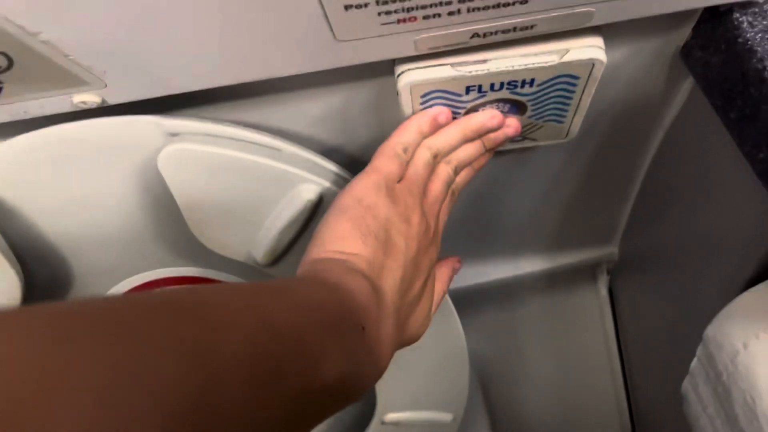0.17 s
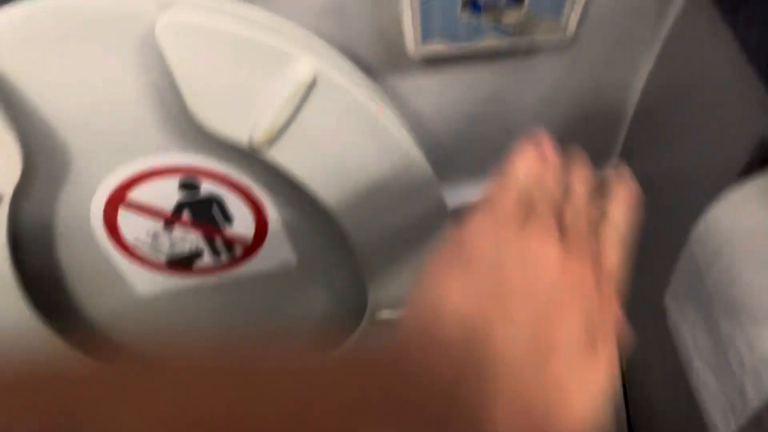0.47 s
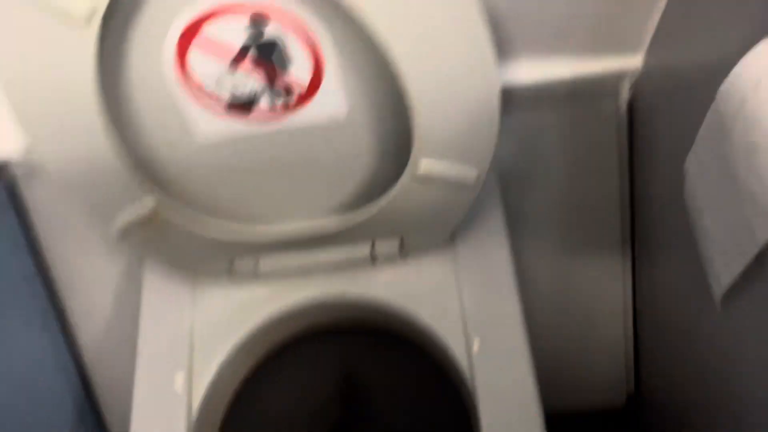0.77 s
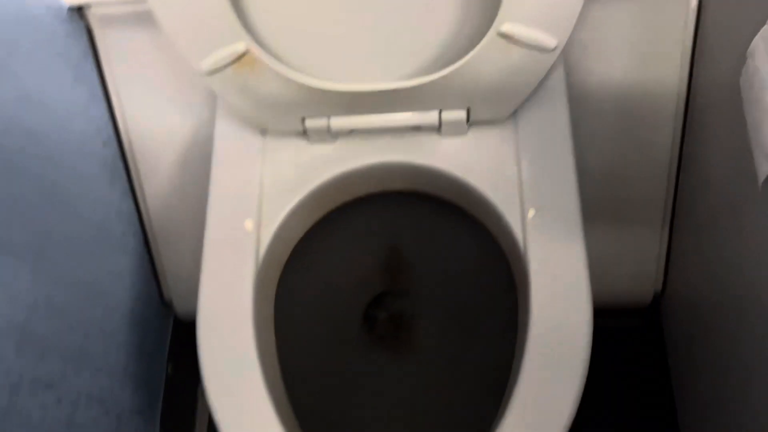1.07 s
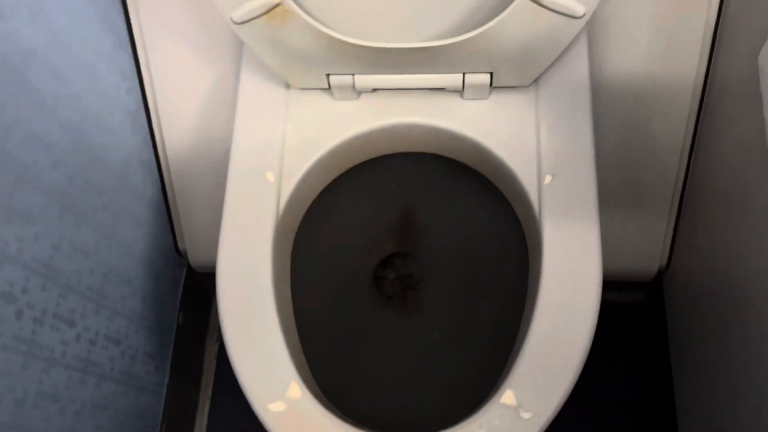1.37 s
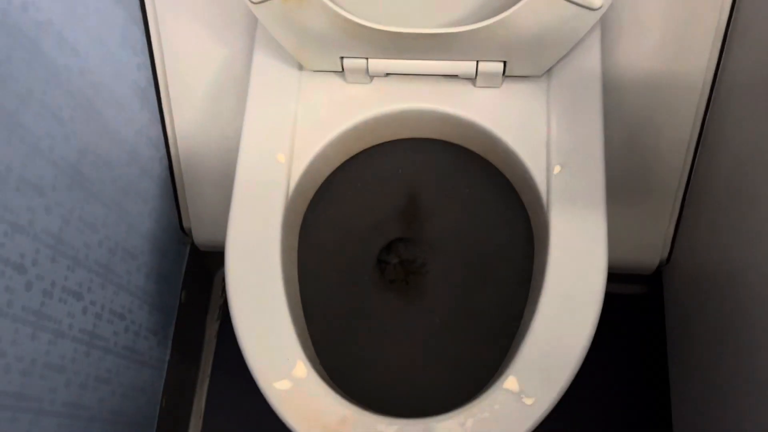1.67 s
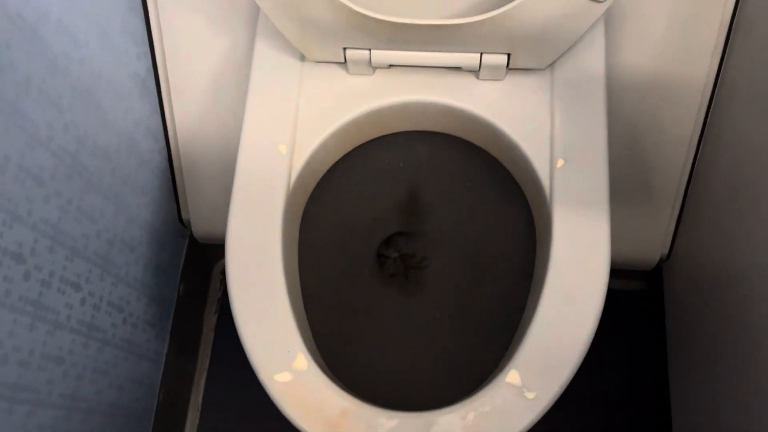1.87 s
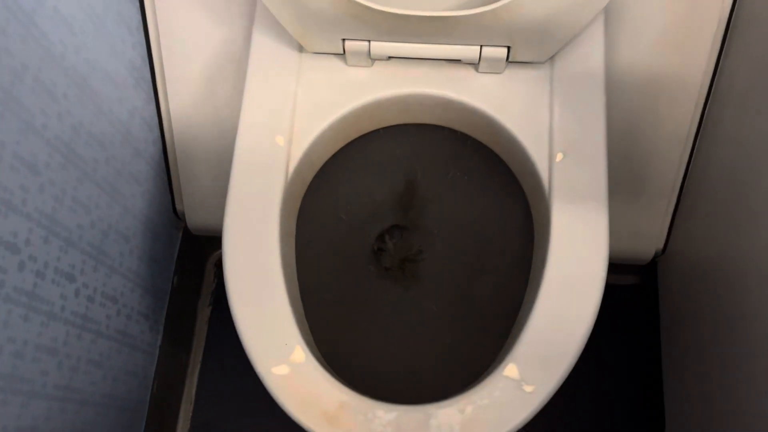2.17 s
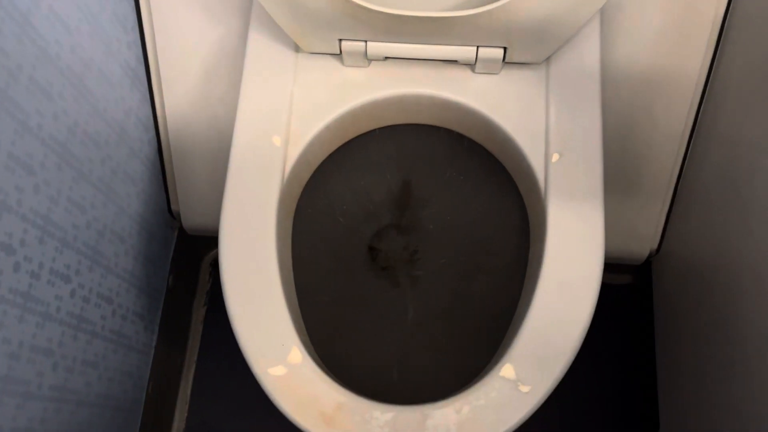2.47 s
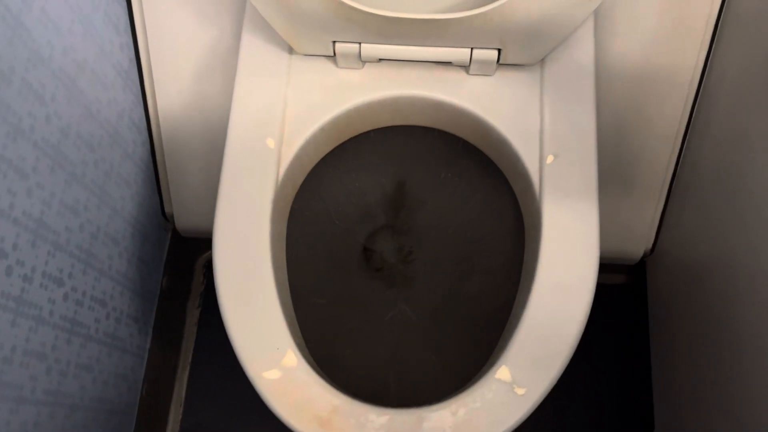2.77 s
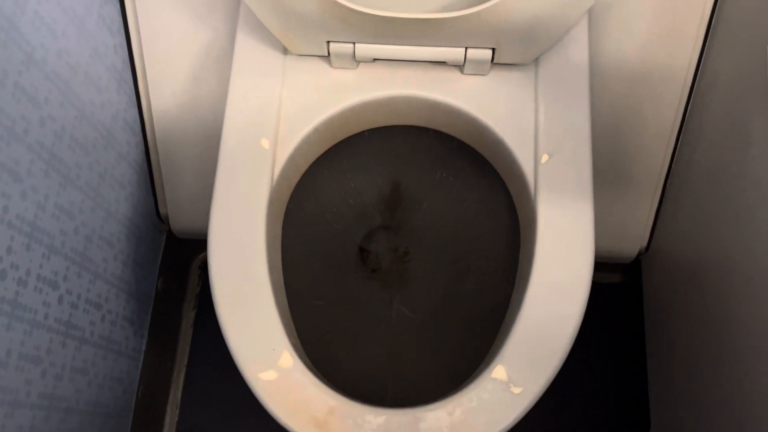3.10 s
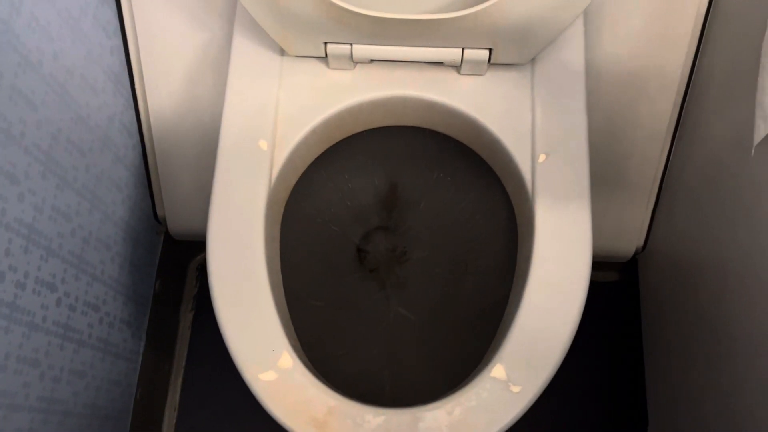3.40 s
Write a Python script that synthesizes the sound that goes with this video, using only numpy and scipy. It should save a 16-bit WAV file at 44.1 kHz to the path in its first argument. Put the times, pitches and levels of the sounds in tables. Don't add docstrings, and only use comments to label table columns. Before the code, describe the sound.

An aircraft-style vacuum toilet flushes with a hissing rinse, deep gulp and rushing air over low drone

```python
import sys
import numpy as np
from scipy import signal
from scipy.fft import rfft, irfft, next_fast_len
from scipy.io import wavfile

SR = 44100
rng = np.random.default_rng(int(sys.argv[2]) if len(sys.argv) > 2 else 0)


def dump(signal):
    limited = np.clip(np.atleast_2d(signal).T, -1, 1)
    pcm = np.round(limited * 32767).astype(np.int16)
    wavfile.write(sys.argv[1], SR, pcm)


def natural_amplitude(level_db):
    exponent = np.asarray(level_db, float) / 20
    return 10 ** exponent


N = 156114

# (frequency [Hz], density [dB per Hz])
CABIN_COLOUR = [(25, -23), (60, -7.5), (110, -14.5), (220, -27.5), (600, -32.5), (1600, -43.5),
                (3300, -50.5), (5500, -81)]
# (frequency [Hz], width [Hz], level [dB])
WALL_BOOMS = [(75, 10.6, 2.5), (90.9, 6.8, -1), (145.2, 21.7, -5.5), (430, 52, -12), (534, 50, -24),
              (1363, 150, -24)]
CABIN_DB, BOOMS_DB = -14.5, -2.5

# (time [s], crack [dB], body [dB])
BUTTON_HITS = [
    (.056, -20.5, -16.5),
    (.0655, -20.5, -15),
    (.302, -36.5, -29),
]
# (time [s], crack [dB], body [dB])
RINSE_VALVE_HITS = [
    (1.709, -28.5, -17),
    (1.7125, -23, -18),
    (1.7215, -36, -7),
]
# (time [s], crack [dB], body [dB])
DRAIN_VALVE_HITS = [
    (3.41, -10.5, -21.5),
    (3.4135, -7, -10.5),
    (3.424, -11, -10.5),
]
# (frequency [Hz], level [dB], t60 [s])
PLATE_MODES = [(203.6, 0.5, 0.19), (478, 2.5, .06), (792, -6, 0.073), (1436, -7.5, 0.1),
               (1963, -3.5, 0.039), (3220, -14, .04), (5300, -15, 0.025)]
# (frequency [Hz], level [dB], t60 [s])
VALVE_MODES = [(157.4, -5, 0.19), (307.5, -6, 0.07), (465, -10, 0.035), (743, -9, 0.031),
               (1223, -12.5, 0.018), (2200, -21.5, 0.081)]
# (frequency [Hz], density [dB per Hz])
PLATE_CRACK = [(300, 11), (1500, -2.5), (3500, -1.5), (5300, -5.5), (7500, -3), (10000, -46), (15000, -43)]
RINSE_CRACK = [(300, 15.5), (2000, -7), (5000, -9.5), (9500, -6.5), (11500, -15), (15000, -15)]
DRAIN_CRACK = [(300, 3), (2500, -15.5), (6000, -14.5), (9000, -27.5)]

# (time [s], length [s], frequency [Hz], level [dB])
SHUDDERS = [(0.0585, 0.001, 5300, -16.5), (0.065, 0.0013, 4040, -17), (0.077, 0.011, 207.4, -15),
            (0.307, .003, 5300, -37), (.191, .0004, 11500, -46), (1.712, 0.0027, 10000, -19),
            (1.712, 0.0014, 2200, -23.5), (1.712, .0015, 14000, -38), (3.4142, 0.00088, 4250, -21),
            (3.416, 0.0018, 2120, -9), (3.429, 0.0026, 1300, -12), (3.417, 0.0027, 991, -15.5),
            (0.346, 0.018, 270.8, -21.5), (2.328, 0.0034, 1900, -5.5), (2.341, .01, 3200, -11),
            (2.342, .008, 1002, -12), (2.37, 0.0046, 2020, -10), (2.341, 0.0094, 3755, -18.5),
            (2.344, 0.0076, 2300, -10.5), (2.373, 0.017, 1500, -5), (2.375, 0.0051, 1970, -3),
            (2.463, .015, 720, -9.5), (1.725, 0.017, 601, -21.5), (1.727, 0.002, 330, -13),
            (2.22, 0.0061, 75, -24), (2.374, 0.012, 460, -4), (2.389, 0.0081, 230.8, -0.5),
            (2.424, 0.011, 417, -3), (2.402, 0.025, 983, -3.5), (2.44, 0.027, 183.5, -11.5),
            (2.48, 0.0074, 287.3, -5.5), (2.489, 0.0037, 256.6, -3), (3.059, 0.045, 54.76, -5),
            (3.344, 0.016, 79.4, -18.5), (3.432, 0.0068, 327.7, -2), (3.442, 0.007, 133.5, -6)]

# (time [s], level [dB])
RINSE_PRESSURE = [(1.705, -89), (1.73, -63.5), (1.78, -42), (1.86, -32), (1.96, -22), (2.0, -20.5),
                  (2.07, -22), (2.13, -22.5), (2.2, -22), (2.33, -17.5), (2.42, -23.5), (2.7, -19.5),
                  (3.54, -25.5)]
# (frequency [Hz], density [dB per Hz])
SPRAY_COLOUR = [(700, -8), (2000, -4.5), (4000, -3.5), (6500, 0.5), (9500, -3), (11500, -0.5), (14000, -3),
                (16000, -6)]
OPEN_S, SWALLOW_HZ, SWALLOW_WIDTH_HZ, SWALLOW_SHARE = 2.1, 4030, 440, .8

# (time [s], level [dB], centre [Hz])
GULP = [
    (2.2, -37.5, 2310),
    (2.3, -20.5, 2210),
    (2.335, -9, 2200),
    (2.37, -5.5, 1110),
    (2.4, -5, 500),
    (2.45, -8, 443),
    (2.475, -4.5, 400),
    (2.51, -31, 397),
    (2.56, -33, 400),
]
GULP_RAGGED_DB = 1
GULP_FALL_DB = 1.2
CREST_S, CREST_LENGTH_S, CREST_DB = 2.335, 0.024, 10.5
# (time [s], level [dB])
FLOW = [
    (2.2, -40),
    (2.3, -31),
    (2.4, -10),
    (2.55, -17.5),
    (3.0, -19),
    (3.42, -23.5),
    (3.54, -22),
]
# (frequency [Hz], density [dB per Hz])
ROAR_COLOUR = [(120, 5), (250, 0), (500, 5.5), (900, 0), (1500, 4), (2300, -1), (4000, -9), (8000, -19)]
# (frequency [Hz], width [Hz], level [dB])
PIPE_MODES = [(222, 44, -0.5), (407.7, 19, 8), (731, 29, -4.5), (1007.5, 35, 10), (1492, 16.7, 4.5),
              (1719, 25, 3.5), (1959, 35, 6), (2288, 30, 8), (2670, 35, -10.5), (3165, 45, 7.5),
              (3600, 20, 2.5), (4710, 24, -1), (4816, 21, 1), (5400, 52, -22), (6020, 58, -6)]
# (frequency [Hz], width [Hz])
BRANCH_DIPS = [(900, 180), (4050, 340)]

# (frequency [Hz], left lead [rad], likeness [0-1], left-right [dB], colour [dB])
PORTS = [(0, .1, .99, 0, 1.5), (90, -.15, .99, -.2, 1), (170, -.28, .99, .5, .5), (280, -.4, .985, .6, -1),
         (520, -.7, 1, 0.3, -1), (670, 1, .45, -2, 0), (760, 1.1, 0.52, -6, 2), (967, 1.6, .6, 1, -3),
         (1100, 1.4, 0.9, -0.5, 1), (1600, 1.6, .5, -3, 0.5), (1800, -1, 0.65, 3.5, -4.5),
         (2300, 0.26, 1, -2.5, -1.5), (2820, 1.5, 0.78, 2, 0.5), (3700, 1, .85, .5, -1),
         (3950, .75, .87, .5, -2), (4300, .7, .87, 0, -2), (4600, .65, .85, -.5, -2),
         (5000, .6, 0.85, -2, -2.5), (5400, 0.8, 0.17, 0.5, -5), (6240, -0.6, 0.54, -2, -2),
         (7860, -3, 1, 5, -3.5), (8470, -2.5, 0.75, -0.5, -0.5), (11050, -5.5, .75, 0.5, 0),
         (13000, -5, 0.82, 0, -1), (14600, -11, .75, 1.5, -5)]
# (low [Hz], high [Hz])
MID_LOST = [(7610, 8950), (14560, 22000)]
SIDE_LOST = [(11100, 13020)]
ROOM_T60_S, ROOM_DB = 0.094, -8.5
# (time [s], level [dB])
AUTO_GAIN = [(0, 0), (1.7, -1.5), (2.0, 0), (2.32, -1.5), (2.39, -6.5), (2.55, -10.5), (3.05, -4.5),
             (3.42, -2), (3.45, -5), (3.54, -6.5)]
HISS_DB, PEAK_LIMIT = -48, 1.38


def rms_one(x):
    return x / np.sqrt(np.mean(x ** 2) + 1e-20)


def in_time(rows):
    s, *columns = np.transpose(rows)
    return [np.interp(np.arange(N) / SR, s, column) for column in columns]


def at_hz(points, hz):
    points_hz, db = np.array(points).T
    return np.interp(np.log(hz), np.log(points_hz), db)


def drift(rate_hz):
    r = np.exp(-80 * np.pi * rate_hz / SR)
    slow = signal.lfilter([1], [1, -2 * r, r * r], rng.standard_normal(N // 40 + 2002))[2000:]
    return np.interp(np.arange(N) / 40, np.arange(len(slow)), rms_one(slow))


def peak(x, hz, width_hz):
    r = np.exp(-np.pi * width_hz / SR)
    feedback = [1, -2 * r * np.cos(2 * np.pi * hz / SR), r * r]
    return signal.lfilter(np.array([1, 0, -1]) * (1 - r * r) / 2, feedback, x)


def bands(colour, patchy_db, move_db, start=0, stop=N):
    out, together = np.zeros((2, N)), drift(2.7)
    edges_hz = 22 * 2 ** np.arange(0, 9.6, .5)
    settle = 8000
    white = rng.standard_normal((2, 2, stop - start + settle))
    for k, (low, high) in enumerate(zip(edges_hz, edges_hz[1:])):
        hz = np.sqrt(low * high)
        if colour[0][0] / 1.5 < hz < colour[-1][0] * 1.5:
            sos = signal.butter(2, [low, high], "band", fs=SR, output="sos")
            band = signal.sosfilt(sos, white[k % 2])[:, settle:]
            patches_db = patchy_db * (.5 * together + drift(7.3))
            level_db = at_hz(colour, hz) + move_db(hz) + patches_db
            out[:, start:stop] += band * natural_amplitude(level_db[start:stop])
    return out


def cabin():
    air = rms_one(bands(CABIN_COLOUR, patchy_db=1.87, move_db=lambda hz: 0))
    air = signal.sosfilt(signal.butter(2, 4500, fs=SR, output="sos"), air)
    white = rng.standard_normal((2, N + SR))
    booms = np.zeros((2, N))
    for hz, width_hz, db in WALL_BOOMS:
        boom = peak(peak(white, hz, width_hz), hz, width_hz)[:, SR:]
        booms += natural_amplitude(db) * rms_one(boom)
    return natural_amplitude(CABIN_DB) * rms_one(air + natural_amplitude(BOOMS_DB) * booms)


def knock(hits, modes, crack, t60_s, top_hz):
    t, out = np.arange(N) / SR, np.zeros((2, N))
    for hz, db, ring_s in modes:
        clicks = np.full((2, N), 1e-18)
        for s, _, body_db in hits:
            clicks[:, int(s * SR)] = natural_amplitude(body_db + db + rng.normal(0, 1, 2))
        r, w = natural_amplitude(-60 / (ring_s * SR)), 2 * np.pi * hz / SR
        out += signal.lfilter([0, np.sin(w)], [1, -2 * r * np.cos(w), r * r], clicks)

    def fade_db(hz):
        life_s = t60_s * (hz / 1000) ** -.25
        fades = [np.where(t < s, -200, db - 60 * (t - s) / life_s) for s, db, _ in hits]
        return np.max(fades, axis=0).clip(-200)

    start, stop = int(hits[0][0] * SR), min(N, int(hits[-1][0] * SR) + SR // 4)
    out = out + natural_amplitude(11) * bands(crack, patchy_db=0, move_db=fade_db, start=start, stop=stop)
    return signal.sosfilt(signal.butter(4, top_hz, fs=SR, output="sos"), out)


def shudders():
    t, out = np.arange(N) / SR, np.zeros(N)
    for s, length_s, hz, db in SHUDDERS:
        out += natural_amplitude(db) * np.exp(-((t - s) / length_s) ** 2) * np.sin(2 * np.pi * hz * t)
    return out * [[1], [.4]]


def rinse():
    water = rms_one(bands(SPRAY_COLOUR, patchy_db=1.04, move_db=lambda hz: 0))
    spray = natural_amplitude(in_time(RINSE_PRESSURE)[0]) * water
    drain_open = np.arange(N) / SR > OPEN_S
    return spray - SWALLOW_SHARE * drain_open * peak(spray, SWALLOW_HZ, SWALLOW_WIDTH_HZ)


def suction():
    (flow_db,), (gulp_db, centre_hz) = in_time(FLOW), in_time(GULP)
    crest_db = CREST_DB * np.exp(-((np.arange(N) / SR - CREST_S) / CREST_LENGTH_S) ** 2)
    gulp_db = gulp_db + GULP_RAGGED_DB * drift(66)

    def air_db(hz):
        gulp_here_db = gulp_db - GULP_FALL_DB * np.log2(hz / centre_hz) ** 2
        return 9.5 + np.maximum(flow_db, gulp_here_db) + crest_db * (hz > 3500)

    air = bands(ROAR_COLOUR, patchy_db=0.58, move_db=air_db)
    out = natural_amplitude(-4) * air
    for k, (hz, width_hz, db) in enumerate(PIPE_MODES):
        out = out + (-1) ** k * natural_amplitude(db) * peak(air, hz, width_hz)
    for hz, width_hz in BRANCH_DIPS:
        out = out - 1.46 * peak(out, hz, width_hz)
    return out


def at_ports(air):
    size = next_fast_len(N + SR // 2)
    hz = np.arange(size // 2 + 1) * SR / size
    t = np.arange(SR // 3) / SR
    echo = rng.standard_normal((2, len(t))) * natural_amplitude(-60 * t / ROOM_T60_S) * (t > .003)
    echo = natural_amplitude(ROOM_DB) * echo / np.sqrt(np.sum(echo ** 2, axis=1, keepdims=True))
    ports_hz, *columns = np.transpose(PORTS)
    lead_rad, alike, pan_db, colour_db = (np.interp(hz, ports_hz, c) for c in columns)
    room = 1 + rfft(echo, size) * (hz > 200)
    direct, diffuse = rfft(air, size) * room * natural_amplitude(colour_db)
    alike = np.clip(alike, 0, 1)
    direct, diffuse = direct * np.sqrt((1 + alike) / 2), diffuse * np.sqrt((1 - alike) / 2)
    turn = np.exp(.5j * lead_rad) * natural_amplitude(pan_db / 2)
    return irfft(np.array([(direct + diffuse) * turn, (direct - diffuse) / turn]), size)[:, :N]


def scene():
    hiss = natural_amplitude(HISS_DB) * signal.lfilter([.3], [1, -.7], rng.standard_normal((2, N)))
    air = cabin() + hiss
    air = air + knock(BUTTON_HITS, PLATE_MODES, PLATE_CRACK, t60_s=0.099, top_hz=9500)
    air = air + shudders()
    air = air + knock(RINSE_VALVE_HITS, VALVE_MODES, RINSE_CRACK, t60_s=0.14, top_hz=17000)
    air = air + rinse() + suction()
    air = air + knock(DRAIN_VALVE_HITS, VALVE_MODES, DRAIN_CRACK, t60_s=0.099, top_hz=8000)
    return at_ports(air)


def roll_off(x):
    return signal.sosfilt(signal.butter(12, 15850, fs=SR, output="sos"), x)


def record(dry):
    ducked = dry * natural_amplitude(in_time(AUTO_GAIN)[0])
    left, right = rfft(PEAK_LIMIT * np.tanh(ducked / PEAK_LIMIT))
    hz, mid, side = np.arange(N // 2 + 1) * SR / N, left + right, left - right
    for half, lost in ((mid, MID_LOST), (side, SIDE_LOST)):
        for low_hz, high_hz in lost:
            half *= np.interp(hz, [low_hz - 60, low_hz, high_hz, high_hz + 60], [1, .003, .003, 1])
    mix = irfft(np.array([mid + side, mid - side]) / 2, N)
    return roll_off(mix)


dry = scene()
out = record(dry)
dump(out)
```